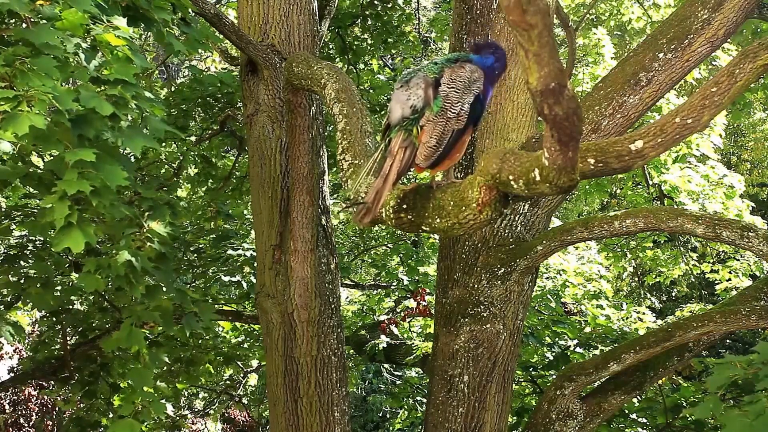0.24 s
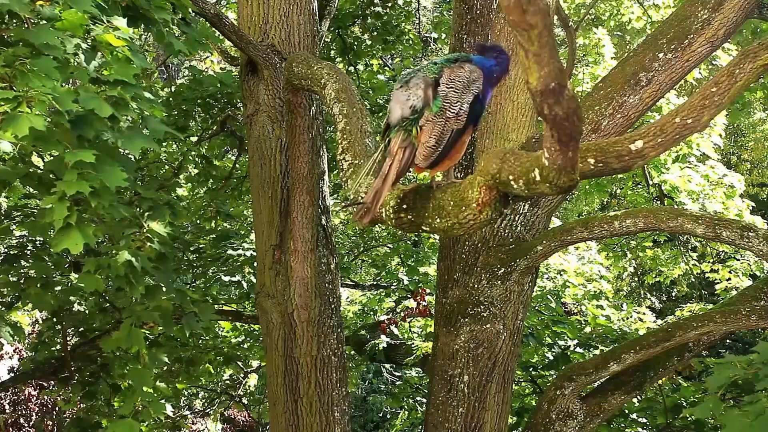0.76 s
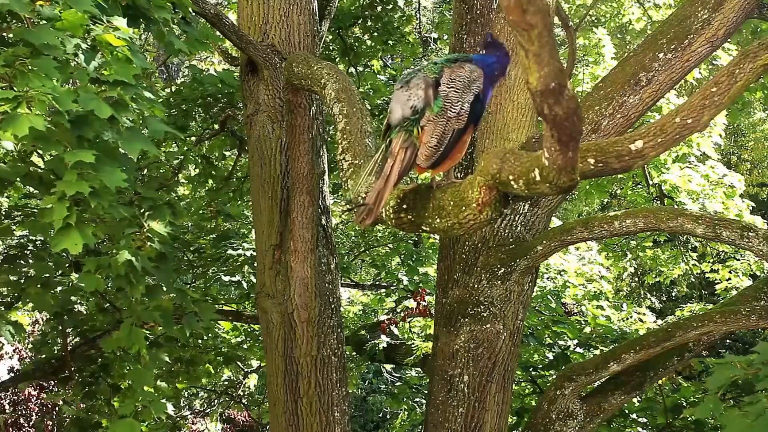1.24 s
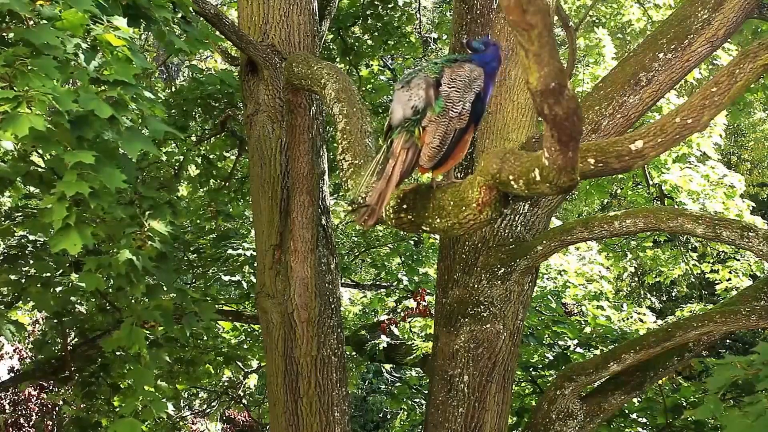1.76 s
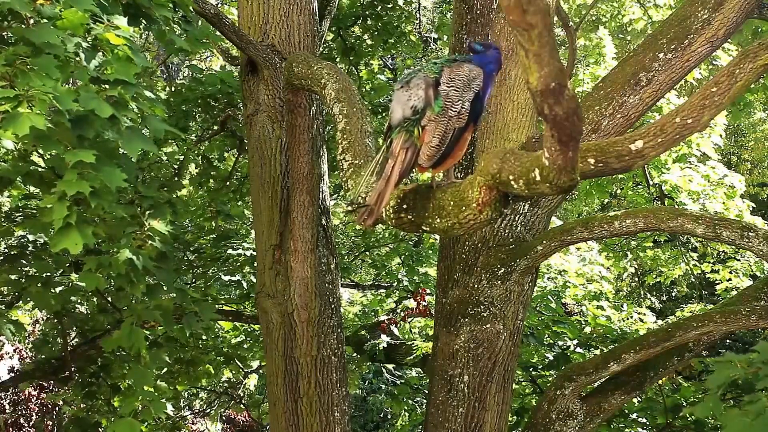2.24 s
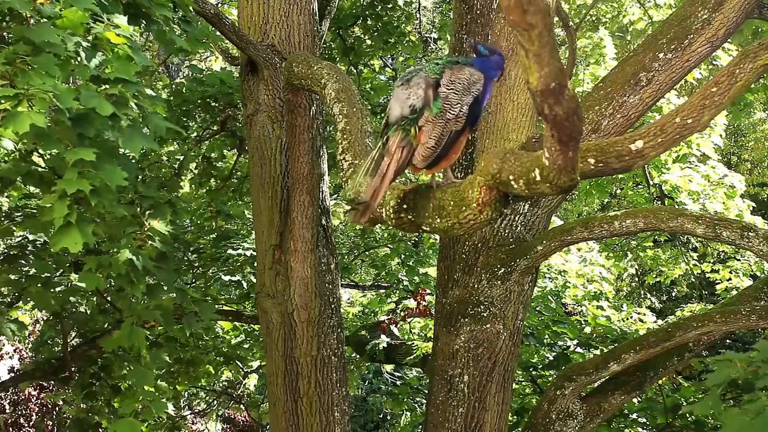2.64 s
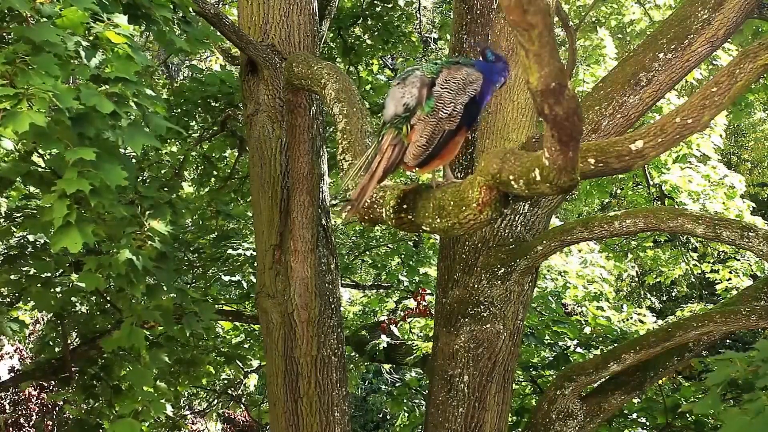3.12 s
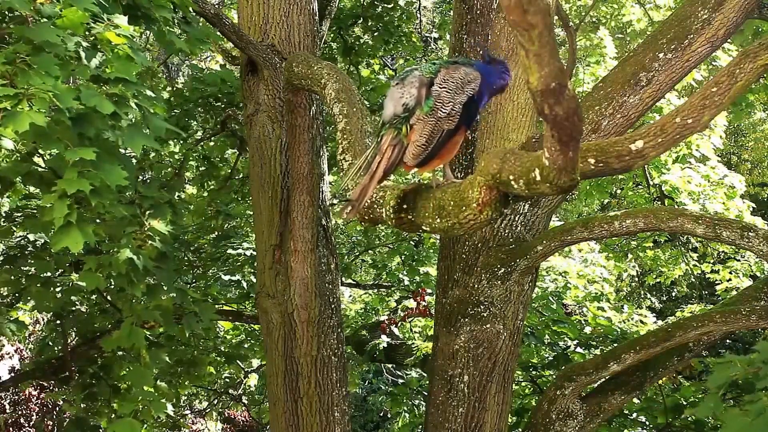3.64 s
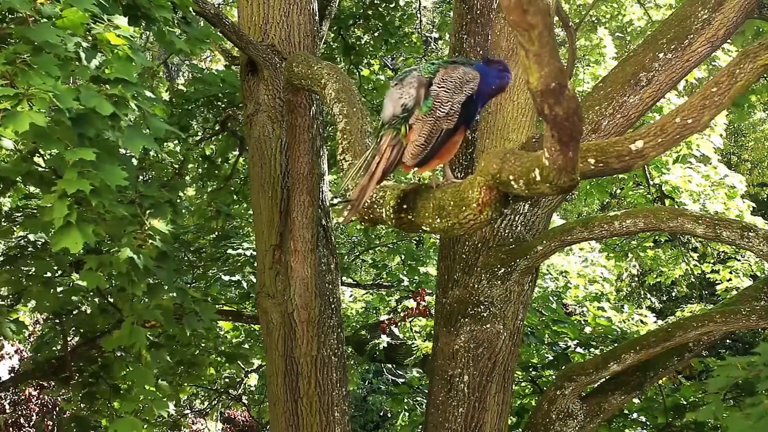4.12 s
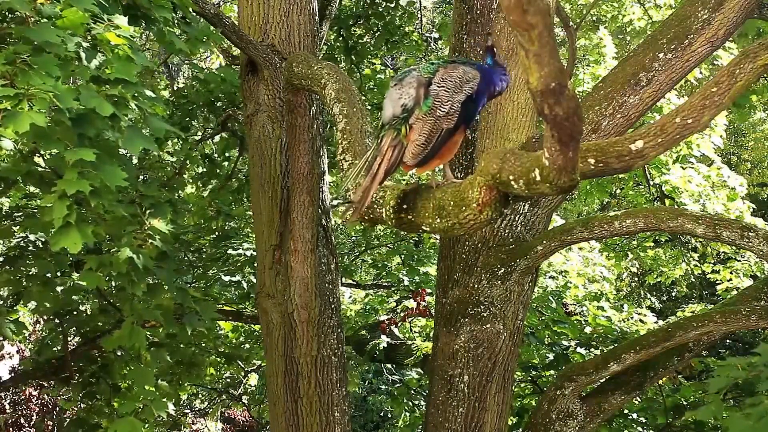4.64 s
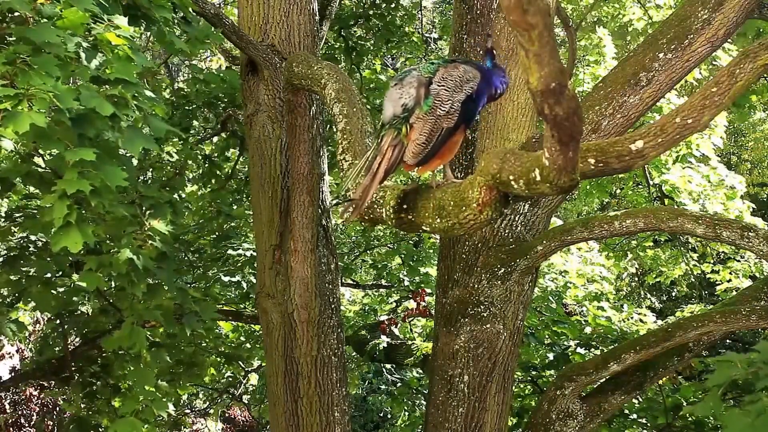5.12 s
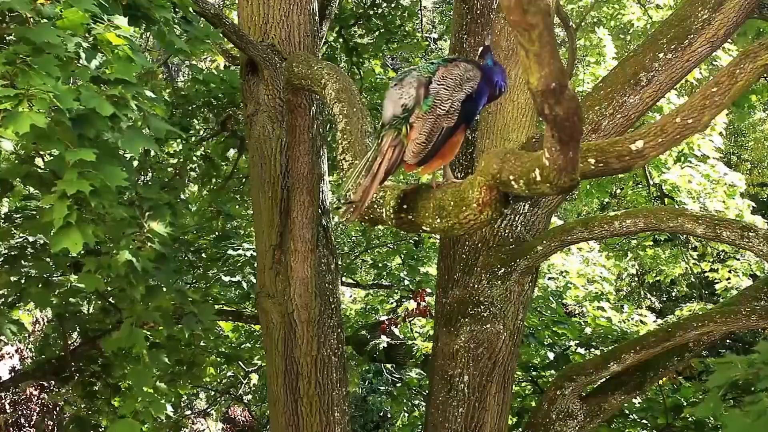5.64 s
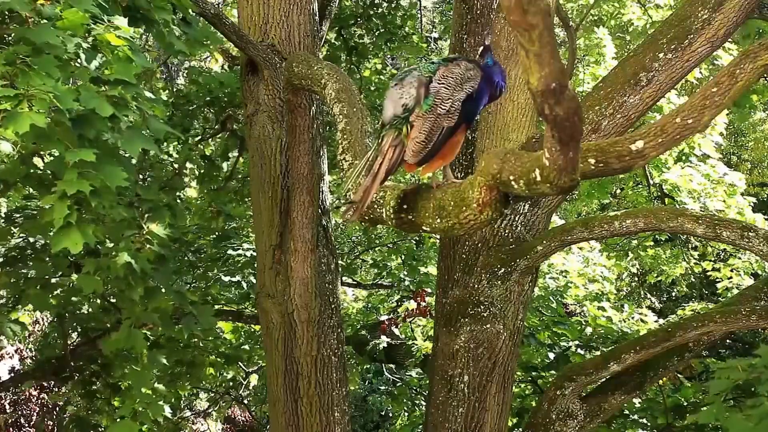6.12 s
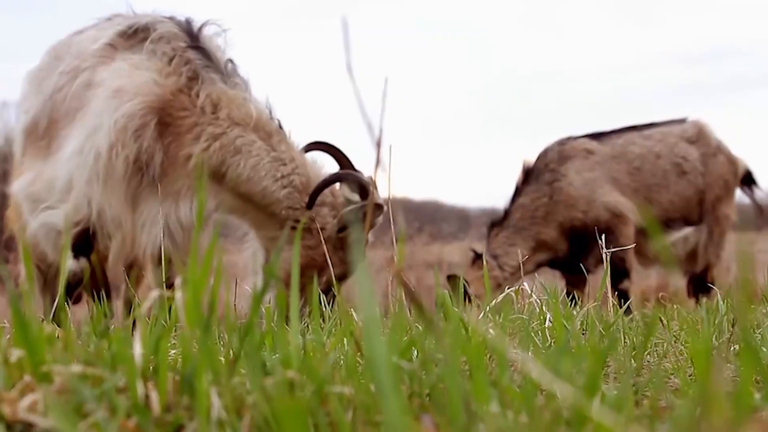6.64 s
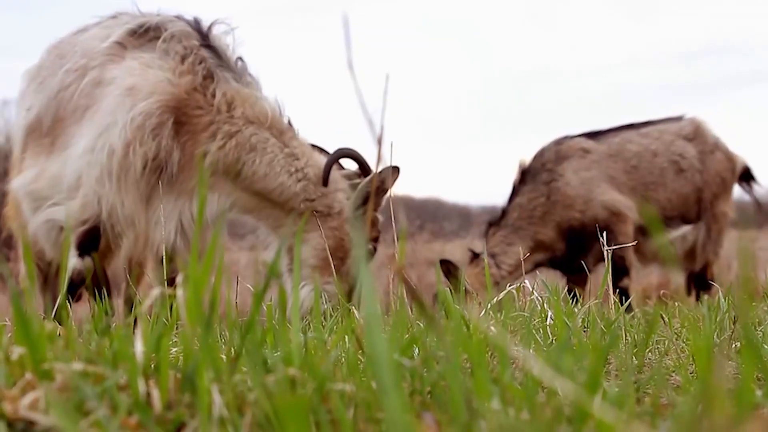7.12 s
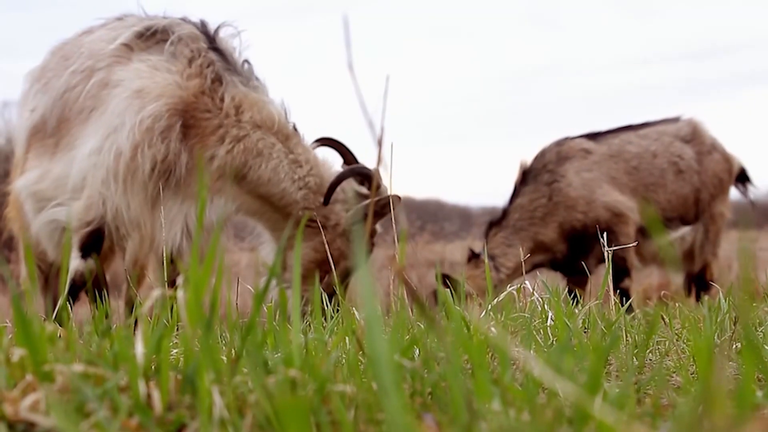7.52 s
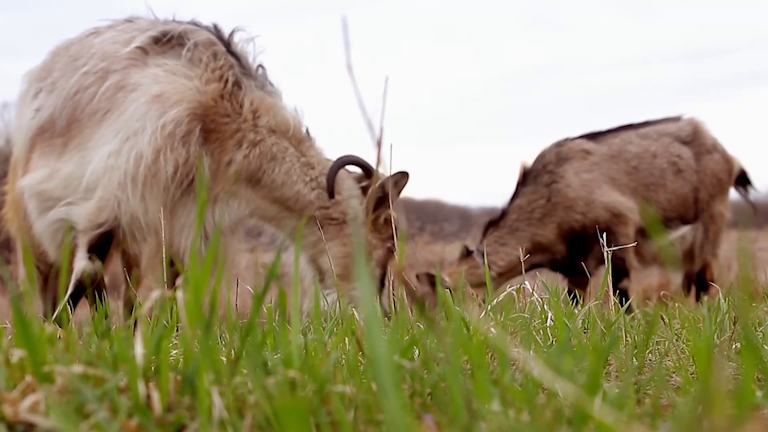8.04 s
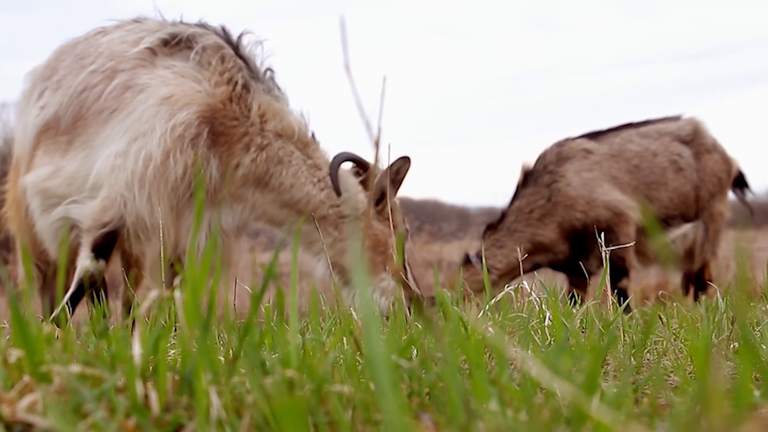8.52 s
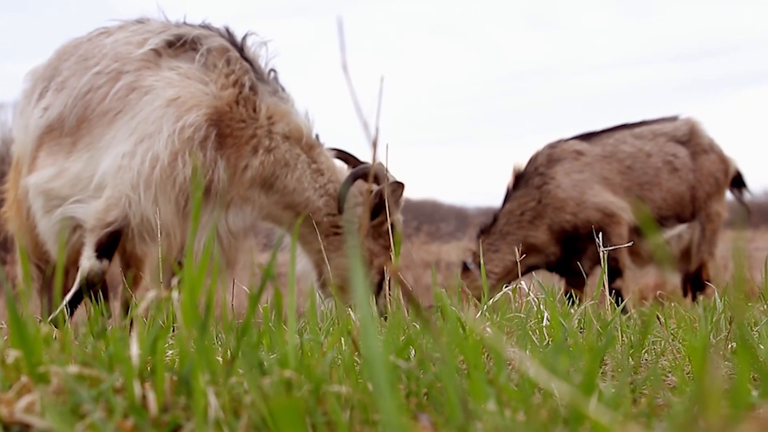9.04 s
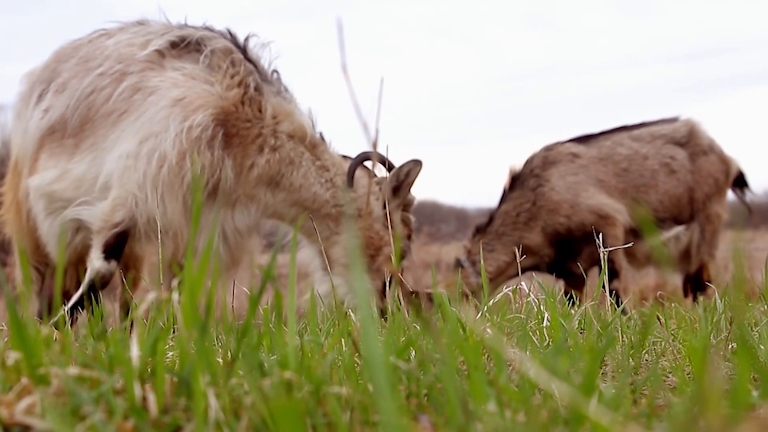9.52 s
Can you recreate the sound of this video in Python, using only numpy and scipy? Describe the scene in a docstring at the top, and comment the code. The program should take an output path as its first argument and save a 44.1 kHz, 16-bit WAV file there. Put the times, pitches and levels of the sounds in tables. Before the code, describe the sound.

A peacock wails in rising three-note cries with hoarse screeches over them, then silence, then a goat bleats in a quiet pasture with birdsong.

```python
"""A peacock's three-note cry is played twice, built from clean gliding partials with its own hiss and garden echo.
A hoarse screech of rough pulses and torn noise is laid over it four times; of the first, only the end is heard.
After a silence comes a pasture: a near goat bleats twice, voice pulses ringing its throat as the chest trembles.
Small birds warble and chirp as gliding whistles, far fowl cluck as short pulse bursts, and wind, as coloured
noise, rumbles low."""
import sys
import numpy as np
from scipy import signal
from scipy.fft import rfft, irfft
from scipy.io import wavfile
from scipy.ndimage import uniform_filter1d

SR = 44100
rng = np.random.default_rng(int(sys.argv[2]) if len(sys.argv) > 2 else 0)


def materialize(psi):
    """Save the field psi as 16-bit PCM at rate SR to the path in sys.argv[1].

    A 1-D psi becomes a single channel; in a 2-D psi each row is a channel.
    """
    bounded = np.clip(np.atleast_2d(psi).T, -1, 1)
    quanta = np.round(bounded * 32767).astype(np.int16)
    wavfile.write(sys.argv[1], SR, quanta)


N = 430857
T = np.arange(N) / SR  # time in seconds


def undb(db):
    """Decibels to an amplitude factor."""
    return 10 ** (np.asarray(db) / 20)


def unit(x):
    """Scales a sound to an average (rms) level of 1."""
    return x / np.sqrt(np.mean(x ** 2))


def noise(count):
    """Plain white noise, a fresh random number for every sample."""
    return rng.standard_normal(count)


def rounded(x, seconds):
    """A moving average rounds off the corners of a curve."""
    return uniform_filter1d(x, max(int(seconds * SR), 1), mode="nearest")


def swell(t, start, top, end):
    """A triangle from 0 up to 1 and back."""
    return np.interp(t, (start, top, end), (0, 1, 0))


def burst(start, length):
    """The samples of a short call and its rounded envelope."""
    first = int(start * SR)
    shape = np.hanning(int(length * SR))
    return slice(first, first + len(shape)), shape


def read(table):
    """The samples that a table spans, and its columns drawn out to a value for each of them."""
    seconds, *columns = np.transpose(table)
    at = slice(int(seconds[0] * SR), min(int(seconds[-1] * SR), N))
    return at, [np.interp(T[at], seconds, column) for column in columns]


def shifted(x, seconds):
    """The same sound later or earlier."""
    k = int(round(seconds * SR))
    return np.r_[np.zeros(max(k, 0)), x[max(-k, 0):], np.zeros(max(-k, 0))][:N]


def colour(x, points, size=2048):
    """A filter through (Hz, dB) points that never rings ahead of the sound."""
    hz, db = np.transpose(points)
    bins_hz = np.fft.rfftfreq(size, 1 / SR)
    log_gain = np.interp(np.log(bins_hz + 1), np.log(hz), db) * np.log(10) / 20
    # folding the cepstrum of the log gain onto positive times makes the filter causal
    cepstrum = irfft(log_gain)
    cepstrum[1:size // 2] *= 2
    cepstrum[size // 2 + 1:] = 0
    response = irfft(np.exp(rfft(cepstrum)))
    return signal.fftconvolve(x, response)[:len(x)]


def echo(x, t60, db):
    """Adds scattered reflections that fade by 60 dB in t60 seconds."""
    t = np.arange(int(t60 * SR)) / SR
    fade = 10 ** (-3 * t / t60) * np.minimum(t / 0.0033, 1)
    tail = noise(len(t)) * fade
    return x + undb(db) * signal.fftconvolve(x, tail / np.linalg.norm(tail))[:len(x)]


def pulses(hz, rough, jitter, shimmer_db):
    """Vocal pulses, a stack of equal partials; with roughness every cycle gets its own length and size."""
    chance = rng.standard_normal((SR, 2))
    cycle = np.cumsum(hz / SR).astype(int)
    phase = np.cumsum(hz * np.exp(jitter * rough * chance[cycle, 0]) / SR)
    size = undb(shimmer_db * rough * chance[(phase + .5).astype(int), 1])
    orders = np.arange(1, int(17000 / hz.min()) + 1)
    kept = np.outer(hz, orders) < 18000  # no partials too high to be sampled
    partials = kept * np.cos(2 * np.pi * np.outer(phase, orders))
    return unit(size * partials.sum(axis=1))


def whistle(notes, flutter_db=0., third_db=-17.0):
    """Gliding tones with octave and third partial (third_db over the octave); the level may flutter."""
    out = np.zeros(N)
    wander = rounded(rounded(noise(N), 0.0037), 0.0037)
    flutter = undb(flutter_db * unit(wander))
    for note in notes:
        at, (hz, db, octave_db) = read(note)
        phase = 2 * np.pi * np.cumsum(rounded(hz, .008)) / SR
        edge = signal.windows.tukey(len(hz), .15)
        upper = np.sin(2 * phase) + undb(third_db) * np.sin(3 * phase)
        out[at] += np.sqrt(2) * edge * (undb(db) * np.sin(phase) + undb(octave_db) * upper)
    return out * flutter


# The colour of the wind. Each row: frequency in Hz, relative noise density in dB per Hz.
WIND_COLOUR = [(15, -39), (25, -8.5), (78, 1), (179, -21), (425, -24), (480, -28), (1690, -31),
               (2210, -26.5), (3800, -35.5), (4410, -25), (9000, -56), (11700, -85), (19800, -120)]


def wind():
    """Coloured noise makes a low rumble and faint hiss, starting with the pasture."""
    from_s, level_db = 6.268, -55
    rumble = unit(colour(noise(N), WIND_COLOUR, size=8192))
    return undb(level_db) * rumble * (T > from_s)


# The far clucks. Each row: start in seconds, level at the peak in dB, pulse rate in Hz, length in seconds.
CLUCKS = [(6.37, -44, 316, .12), (6.61, -39.5, 300, 0.11), (6.67, -33.5, 310, 0.031),
          (8.54, -56, 312, 0.09), (8.59, -41, 312, 0.031), (8.6, -35, 313.6, 0.056),
          (8.635, -44, 312, 0.041), (8.82, -55.5, 305, 0.11), (8.865, -37, 306.4, 0.1),
          (8.915, -30, 318.6, .08), (9.45, -41.5, 314, 0.094)]
# The ringing of the fowl's throat. Each row: frequency in Hz, relative gain in dB.
CLUCK_THROAT = [(500, -56.5), (850, -19), (1200, -33.5), (1570, -11.5), (1900, -16.5), (2200, 3.5),
                (2380, -10), (2600, 4), (3100, -16.5), (3330, -0.5), (3600, -39), (5000, -63)]


def fowl():
    """Rough voice pulses ring a throat in short clucks that swell and fade, with a long echo."""
    out = np.zeros(N)
    for start, db, hz, length in CLUCKS:
        at, shape = burst(start, length)
        source = pulses(np.full(len(shape), 1. * hz), rough=1, jitter=0.014, shimmer_db=3.6)
        out[at] += undb(db) * shape ** 2 * unit(colour(source, CLUCK_THROAT))
    return echo(out, t60=0.42, db=-8.5)


# The warbles, each a list of the points where it turns.
# Each row: time in seconds, pitch in Hz, level in dB before the flutter.
WARBLES = [
    [(6.615, 2174, -42), (6.649, 3550, -39), (6.665, 3000, -34), (6.68, 3320, -29.5), (6.707, 3250, -29),
     (6.721, 3655, -38), (6.745, 2800, -29), (6.765, 2510, -31), (6.79, 3130, -25), (6.8, 2600, -45)],
    [(7.375, 1950, -43), (7.39, 2980, -26), (7.407, 3350, -25), (7.431, 1950, -32), (7.449, 1750, -25),
     (7.47, 1900, -42)],
    [(7.465, 3310, -35), (7.49, 2380, -33), (7.51, 3200, -21), (7.52, 3300, -41)],
    [(9.11, 2000, -46), (9.128, 3240, -43.5), (9.146, 2905, -40.5), (9.165, 3660, -40), (9.174, 3480, -38),
     (9.194, 2850, -22), (9.203, 2234, -28), (9.23, 3700, -29), (9.243, 3260, -19), (9.257, 1860, -32),
     (9.276, 3200, -29), (9.284, 3300, -45)],
]
# The octave above a warble, strongest on low turns. Each row: pitch in Hz, octave level in dB over the tone.
WARBLE_OCTAVE = [(1950, 4), (2200, -6), (2350, -32), (2900, -48), (3280, -31), (3700, -42)]
# Short piped notes, and a faint high overtone (the 5400 Hz row, third partial of the 1800 Hz note).
# Each row: start in seconds, length in seconds, first pitch in Hz, last pitch in Hz,
# level in the middle in dB before the flutter, octave level there in dB before the flutter.
PIPS = [(6.635, .025, 1800, 1795, -37, -47), (6.64, .1, 5400, 5400, -52, -82),
        (6.688, .024, 2160, 2125, -34, -58), (8.89, .08, 860, 800, -53, -65),
        (9.175, .055, 2330, 2310, -47, -29), (9.355, .035, 2120, 2080, -49, -75),
        (9.475, .03, 2230, 2200, -41, -70)]
# A longer falling whistle in two parts.
# Each row: time in seconds, pitch in Hz, level and octave level in dB before the flutter.
FALLING = [
    [(7.985, 1410, -51, -48), (8.01, 1377, -54, -42), (8.03, 1420, -54, -40), (8.068, 1345, -43, -39.5),
     (8.11, 1400, -52, -39)],
    [(8.125, 2770, -41, -85), (8.16, 2527, -27.5, -66), (8.21, 2530, -23.5, -66), (8.24, 2400, -30.5, -85),
     (8.265, 2180, -27.5, -67), (8.28, 2100, -40, -76)],
]
# High falling chirps. Each row: start in seconds, peak in dB, middle pitch in Hz, length in seconds.
CHIRPS = [(6.294, -44, 4200, 0.025), (6.5135, -40.5, 4320, 0.021), (6.551, -40, 4230, 0.03)]


def birds():
    """Gliding whistles and short falling tones make warbles, pips and chirps that ring across the field."""
    warbles = []
    for warble in WARBLES:
        at, (hz, db) = read(warble)
        octave_db = db + np.interp(hz, *np.transpose(WARBLE_OCTAVE))
        warbles.append(np.c_[T[at], hz, db, octave_db])
    pips = []
    for start, length, first_hz, last_hz, db, octave_db in PIPS:
        edge_db, octave_edge_db = db - 15, octave_db - 15  # softer at both ends
        pips.append([(start, first_hz, edge_db, octave_edge_db),
                     (start + length / 2, (first_hz + last_hz) / 2, db, octave_db),
                     (start + length, last_hz, edge_db, octave_edge_db)])
    out = whistle(warbles + pips + FALLING, flutter_db=2.5, third_db=-26.0)
    for start, db, hz, length in CHIRPS:
        at, shape = burst(start, length)
        falling_hz = hz * np.linspace(1.04, .96, len(shape))
        out[at] += undb(db) * shape * np.sin(2 * np.pi * np.cumsum(falling_hz) / SR)
    return echo(out, t60=0.28, db=-7.5)


# The two bleats before tremble and catches are added. Each row: time in seconds, pitch in Hz,
# body level in dB (5 dB is added), treble level in dB (1.5 dB is added),
# mouth closing (0 open, 1 shut, kept within these once the tremble is added).
BLEATS = [
    [(6.755, 283, -39, -43, .3), (6.78, 277, -31, -35, .24), (6.865, 300, -30, -33, .22),
     (6.985, 334, -29, -30, .4), (7.085, 338, -28.5, -30, .35), (7.28, 320, -29, -30.5, .5),
     (7.56, 309, -30, -30, .6), (7.71, 282, -34.5, -30.5, .85), (7.755, 272, -41, -37, .35),
     (7.775, 246, -38, -47, .6)],
    [(9.505, 246, -36, -39, .2), (9.54, 250, -34, -34, .2), (9.59, 258, -35, -35, -.1),
     (9.645, 267, -31.5, -35, .2), (9.77, 292, -30, -30, .05)],
]
# The closed-mouth hum that leads into each bleat.
# Each row: time in seconds, pitch in Hz, level in dB, octave level in dB.
HUMS = [
    [(6.665, 191, -73, -65), (6.7, 254, -69, -73), (6.76, 285, -60, -58)],
    [(9.4, 163, -67, -64), (9.45, 203.5, -67, -61), (9.51, 254, -56, -54)],
]
# Pushes of the chest. Each row: start in seconds, top in seconds, end in seconds, pitch lift in Hz.
TREMBLES = [(6.78, 6.833, 6.864, 50), (6.864, 6.93, 6.985, 62), (6.985, 7.045, 7.083, 33),
            (7.083, 7.155, 7.282, 38), (7.282, 7.345, 7.386, 28), (7.386, 7.47, 7.506, 42),
            (7.515, 7.565, 7.61, 20), (7.61, 7.665, 7.705, 20), (7.715, 7.736, 7.755, 18),
            (9.53, 9.59, 9.645, 80), (9.645, 9.7, 9.76, 55)]
# Moments when the voice breaks rough. Each row: middle in seconds, half length in seconds, pitch leap in Hz.
CATCHES = [(6.926, .014, 12), (7.03, .007, 3), (7.135, .013, 52), (7.445, .014, 3), (7.606, .009, 1),
           (9.695, .016, 50)]
# The throat with the mouth wide open. Each row: frequency in Hz, relative gain in dB.
THROAT_OPEN = [(120, -43), (200, -12.5), (640, -2.5), (950, 5), (1500, -1), (2200, 4), (2650, -5.5),
               (3170, 8.5), (4160, -21.5), (5550, -8), (7420, -23), (9210, -16), (11400, -39.5),
               (13500, -43), (16000, -48)]
# The throat with the mouth nearly shut. Each row: frequency in Hz, relative gain in dB.
THROAT_SHUT = [(120, -24), (200, -8.5), (400, 0.5), (650, 4), (950, 6.5), (1200, -2), (1700, -12),
               (2420, 4.5), (3300, -10), (4240, -13), (5360, -10.5), (7280, -32.5), (8800, -19.5),
               (11000, -29), (16000, -55)]
# High resonances and gaps of the nose. Each row: frequency in Hz, relative gain in dB.
NOSE = [(9500, -0.5), (10300, -2), (11300, 6), (12600, -10), (13500, 4), (14500, -2)]
# The tone colour of each bleat. Each row: frequency in Hz, relative gain in dB.
BLEAT_COLOURS = [
    [(400, -1.5), (1000, 0), (2100, -1), (2700, 1)],
    [(400, 6), (1000, 0.5), (2100, 5.5), (2700, -2)],
]


def goat():
    """Sharp pulses ring the throat; the chest trembles pitch and level; breath hisses along."""
    lead_s = .012  # the level follows each push this much ahead of the pitch
    out = whistle(HUMS)
    for bleat, bleat_colour in zip(BLEATS, BLEAT_COLOURS):
        at, (hz, db, treble_db, shut) = read(bleat)
        t = T[at]
        rough, leap_hz = 0.12, 0
        for middle, half, hz_up in CATCHES:
            catch = np.exp(-((t - middle) / half) ** 2)
            rough = rough + catch
            leap_hz = leap_hz + catch * hz_up
        lift_hz = sum(up * swell(t, *times) for *times, up in TREMBLES)
        push_hz = sum(up * swell(t + lead_s, *times) for *times, up in TREMBLES)
        # each Hz of lift or leap also moves the levels, and each Hz of lift the mouth
        hz = hz + lift_hz + leap_hz
        shut = np.clip(shut + .005 * lift_hz, 0, 1)
        db = db + .09 * push_hz + .06 * leap_hz
        treble_db = treble_db + .06 * lift_hz + .06 * leap_hz
        voiced = pulses(rounded(hz, 0.011), rough, jitter=0.034, shimmer_db=0.99)
        breath = undb(-28) * noise(len(hz))
        source = colour(voiced + breath, bleat_colour + NOSE)
        opened = unit(colour(source, THROAT_OPEN))
        closed = unit(colour(source, THROAT_SHUT))
        voice = (1 - shut) * opened + shut * closed
        # body and treble, parted at 4000 Hz, get levels of their own
        body = signal.sosfiltfilt(signal.butter(2, 4000, fs=SR, output="sos"), voice)
        out[at] += undb(db + 5) * unit(body) + undb(treble_db + 1.5) * unit(voice - body)
    return echo(out, t60=0.094, db=-8.5)


def torn(hz):
    """A stack of partials, each shaken in size and phase by its own noise, so that each smears into a band."""
    tear_s = .003  # how fast each partial tears
    phase = 2 * np.pi * np.cumsum(hz) / SR
    out = 0
    for k in range(1, 20):
        a, b = (rounded(rounded(noise(len(hz)), tear_s), tear_s / 2) for _ in range(2))
        out = out + a * np.cos(k * phase) + b * np.sin(k * phase)
    return unit(out)


# The screech before it locks. Each row: time in seconds, pulse rate in Hz, level in dB, roughness from 0 to 1.
SCREECH = [(.44, 810.7, -51, .9), (.6, 801.6, -39.5, .9), (.625, 794, -52.5, .9), (.64, 819.5, -30.5, .7),
           (.69, 746, -24, .8), (.76, 742, -22.5, .8), (.85, 705.6, -25, .8), (.92, 775, -21.5, .7),
           (.98, 801.4, -19, .6), (1.035, 812, -19.5, .4), (1.14, 810, -19.5, .3), (1.175, 853, -19.5, .15),
           (1.185, 859, -44.5, .4)]
# Thin squeaks around its start and end.
# Each row: time in seconds, pitch in Hz, level and octave level in dB before the flutter.
SQUEAKS = [
    [(.44, 3000, -56, -64.5), (.48, 3125, -42, -53), (.505, 2850, -41.5, -48), (.525, 2450, -45.5, -47),
     (.555, 2250, -44, -42.5), (.58, 2380, -38.5, -49), (.62, 2460, -48, -42.5)],
    [(.6, 3150, -53.5, -83), (.61, 3120, -39.5, -83), (.63, 2900, -40.5, -80.5)],
    [(1.178, 3090, -32.5, -40), (1.192, 2980, -33, -40), (1.205, 2415, -45.5, -53),
     (1.215, 2170, -69, -57.5)],
]
# The throat while the screech rasps low. Each row: frequency in Hz, relative gain in dB.
RASP_THROAT = [(290, -68), (500, -30.5), (706, -21.5), (968, -15.5), (1130, -20.5), (1240, -12), (1390, -4),
               (1510, -8.5), (1850, 1.5), (2930, -11.5), (3740, -2), (5750, -20), (8600, -20.5),
               (11300, -43), (15500, -31)]
# The throat once it tightens. Each row: frequency in Hz, relative gain in dB.
TIGHT_THROAT = [(290, -74), (500, -37.5), (815, -28), (1270, -31), (1700, -0.5), (2200, -6.5), (2390, -11),
                (2930, -16), (4070, -5.5), (4440, -14), (4770, -11), (5430, -22.5), (8600, -20),
                (9650, -33), (15500, -42)]
# The hiss that comes with the screech. Each row: frequency in Hz, relative noise density in dB per Hz.
SCREECH_HISS = [(30, -20.5), (60, -2.5), (150, -10), (500, -12), (3000, -20), (15000, -36)]
# The four playings. Each entry: shift in seconds, earlier if negative.
SCREECH_SHIFTS_S = (-1.06773, 0, 1.76841, 4.00397)


def screech():
    """Chaotic pulses drown in torn turbulence, then lock into a nearly clean tone for a moment near the end."""
    at, (hz, db, rough) = read(SCREECH)
    t = T[at]
    lock = rounded(1. * (t > 1.04) * (t < 1.092), .011)
    hz = hz + lock * (824 - hz)
    rough = np.clip(rough + lock * (.035 - rough), 0, 1)
    torn_share = 0.34  # the rest of the turbulence is plain noise
    turbulence = np.sqrt(torn_share) * torn(hz) + np.sqrt(1 - torn_share) * noise(len(hz))
    voiced = pulses(hz, rough, jitter=.2, shimmer_db=5.4)
    source = np.sqrt(1 - rough) * voiced + np.sqrt(rough) * turbulence
    tight = np.interp(t, (.89, .97), (0, 1))
    rasping = unit(colour(source, RASP_THROAT))
    tightened = unit(colour(source, TIGHT_THROAT))
    voice = whistle(SQUEAKS, flutter_db=5.5, third_db=-22)
    voice[at] += undb(db) * ((1 - tight) * rasping + tight * tightened)
    hiss = undb(-73) * unit(colour(noise(N), SCREECH_HISS, size=8192)) * (T > SCREECH[0][0])
    once = (echo(voice, t60=0.22, db=-15) + hiss) * (T < 1.285)
    return sum(shifted(once, s) for s in SCREECH_SHIFTS_S)


# Partial levels at each stage of a note, shared by all notes, in the order of time.
# Each entry: stage name, then the levels of partials 1, 2, 3 and 4 in dB before a note's own changes.
CRY_STAGES = {"start": (-56, -50, -34, -48), "bend": (-38, -37.5, -24.5, -39),
              "scooped": (-28.5, -26, -24, -46), "settled": (-25, -27.5, -28, -50),
              "swelled": (-25.5, -25, -17.5, -49), "sagged": (-24, -27.5, -20.5, -43),
              "lift": (-24, -28.5, -23.5, -45), "rising": (-31, -15.5, -22, -38),
              "top": (-21, -13.5, -18.5, -46), "falling": (-26.5, -14.5, -25, -40.5),
              "sliding": (-26.5, -18, -25, -39), "knee": (-21, -26, -25, -47),
              "drop": (-33, -36, -25.5, -46), "end": (-32, -42, -36, -40)}


def cry_note(start, held, sagged, lift, top, top_hz, end,
             early_db, settling_db, sag2_db, sag3_db, lifting_db, ending_db):
    """Scoop up, hold, lift to the top, slide back and drop: rows (s, pitch Hz, dB of partials 1-4)."""
    times = [start, start + .022, start + .055, start + .11, start + .16, start + .21,
             lift, (lift + top) / 2, top, top + .05, top + .1, end - .05, end - .022, end]
    hz = [568, 657, held - 14, held, (held + sagged) / 2, sagged,
          788, 866, top_hz, 875, 826, 800, 657, 546]
    # this note's own dB over the shared stages
    own = {"bend": early_db / 3,
           "scooped": (early_db, 0, -settling_db, 0),
           "settled": (early_db, 0, settling_db, 0),
           "swelled": (early_db, sag2_db, sag3_db, 0),
           "sagged": (early_db / 2, sag2_db, sag3_db, 0),
           "lift": lifting_db, "rising": lifting_db,
           "knee": ending_db, "drop": ending_db, "end": ending_db}
    levels = [np.add(db, own.get(stage, 0)) for stage, db in CRY_STAGES.items()]
    return np.c_[times, hz, levels]


# The three notes of the cry. Each row: start in seconds, held pitch in Hz, sagged pitch in Hz,
# lift in seconds, top in seconds, top pitch in Hz, end in seconds, then dB over the shared stages:
# partial 1 early, partial 3 settling, partial 2 sagging, partial 3 sagging, all lifting, all ending.
CRY_NOTES = [(.424, 768, 738, .71, .81, 915, 1.0, 2, -3.5, -10, -2.5, 2, 1.5),
             (1.137, 765, 772, 1.41, 1.51, 919, 1.7, 0, 0, 0, 0, -1.5, 0),
             (1.84, 754, 740, 2.1, 2.2, 911, 2.392, -10.5, 7, 1, -6, -1, -4)]
# The weak upper partials. Each entry: level of partial 5, 6 or 7 in dB over partial 4.
CRY_TOP_DB = [-12, -19, -31]
# The colour of the garden hiss. Each row: frequency in Hz, relative noise density in dB per Hz.
GARDEN_HISS = [(20, 0), (60, -12), (180, -12.5), (600, -11.5), (1500, -6.5), (3000, -8.5), (5200, -16.5)]


def peacock():
    """Clean partials on a rising and falling pitch, dulled as by a low sample rate, with faint mirror tones."""
    low_rate = 11025  # Hz
    voice = np.zeros(N)
    for note in CRY_NOTES:
        at, (hz, *db) = read(cry_note(*note))
        db += [db[-1] + d for d in CRY_TOP_DB]
        # the weak partials from the fourth up break up
        for k in range(3, len(db)):
            wander = rounded(rounded(noise(len(hz)), .012), .012)
            db[k] = db[k] + 4.4 * unit(wander)
        phase = 2 * np.pi * np.cumsum(rounded(hz, .02)) / SR
        edge = signal.windows.tukey(len(hz), .06)
        # k * k spreads the starting phases
        partials = sum(undb(d) * np.sin(k * phase + k * k) for k, d in enumerate(db, 1))
        voice[at] = np.sqrt(2) * edge * partials
    hiss = undb(-41.5) * unit(colour(noise(N), GARDEN_HISS, size=8192))
    low_pass = signal.ellip(8, .5, 70, .49 * low_rate, fs=SR, output="sos")
    low = signal.sosfilt(low_pass, echo(voice, t60=0.35, db=-7) + hiss)
    # the mirror tones lie on both sides of the low rate
    low += undb(-56) * 2 * voice * np.cos(2 * np.pi * low_rate * T)
    offset = .0039  # a small constant shift of the wave
    phrase = (low + offset) * (T > 0.38) * (T < 2.515)
    return phrase + shifted(phrase, 104474 / 44100)


def scene():
    """All sources together, the same on both channels."""
    mix = wind() + fowl() + birds() + goat() + screech() + peacock()
    return np.tile(mix, (2, 1))


def record(dry):
    """A steep low-pass filter cuts the top above 15800 Hz."""
    return signal.sosfilt(signal.ellip(10, .2, 70, 15800, fs=SR, output="sos"), dry)


dry = scene()
out = record(dry)
materialize(out)
```